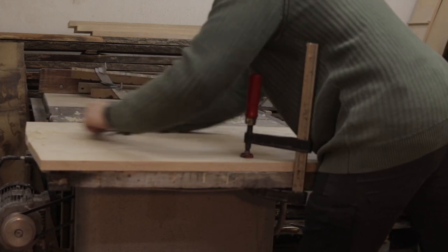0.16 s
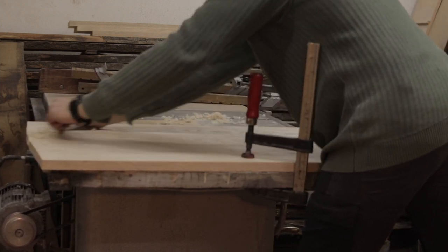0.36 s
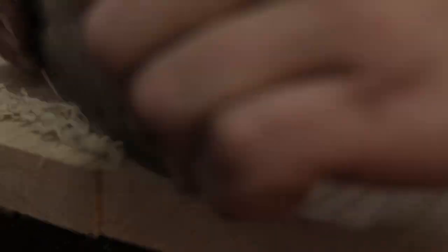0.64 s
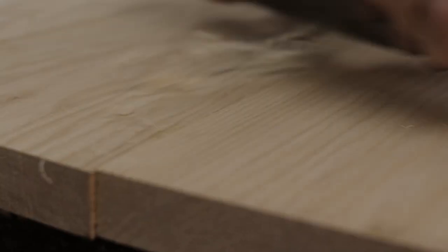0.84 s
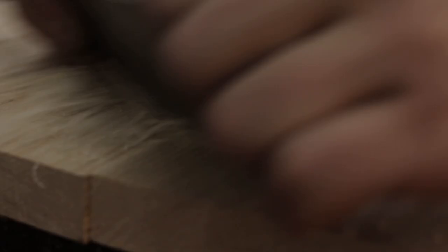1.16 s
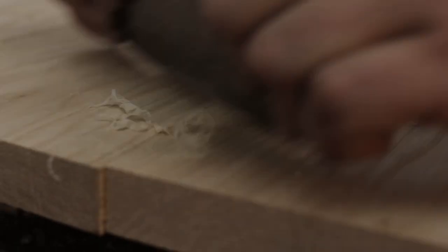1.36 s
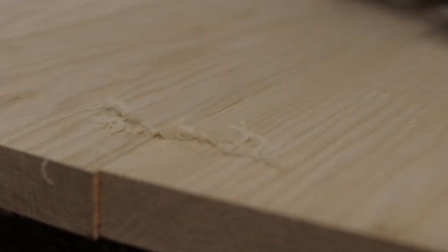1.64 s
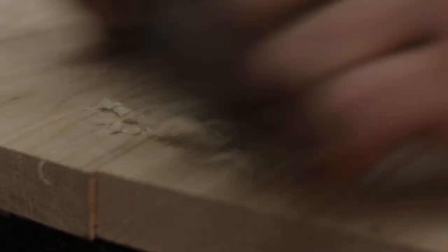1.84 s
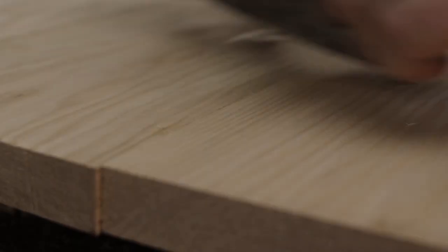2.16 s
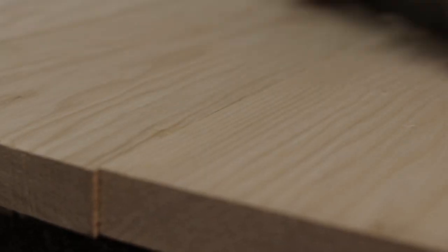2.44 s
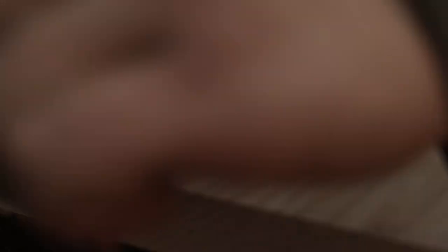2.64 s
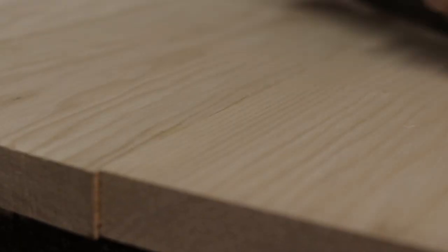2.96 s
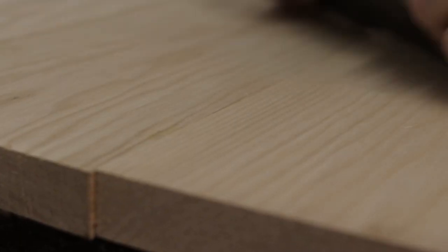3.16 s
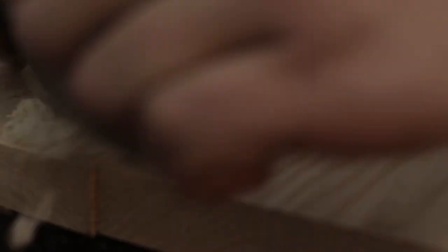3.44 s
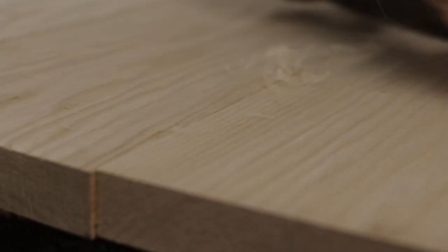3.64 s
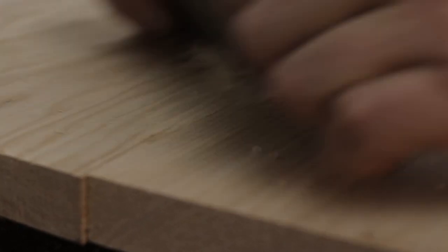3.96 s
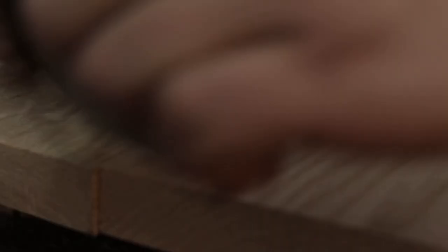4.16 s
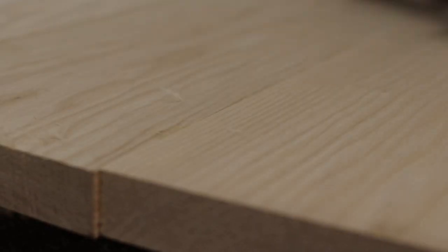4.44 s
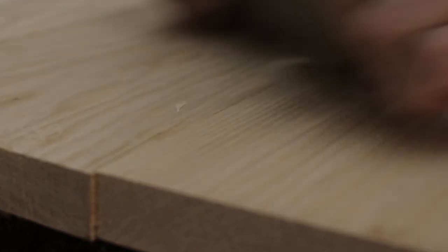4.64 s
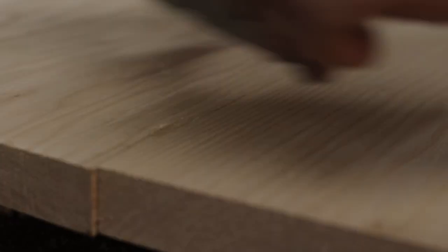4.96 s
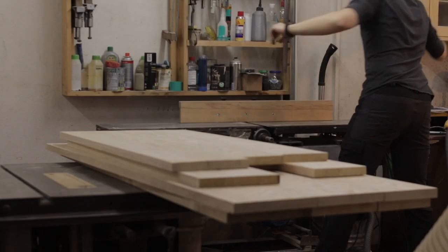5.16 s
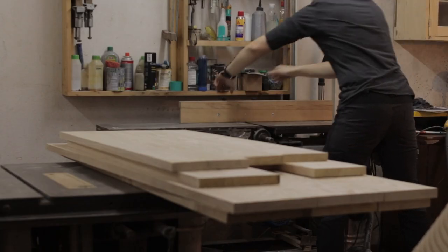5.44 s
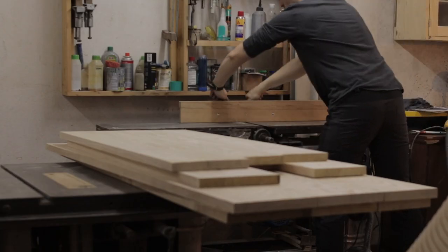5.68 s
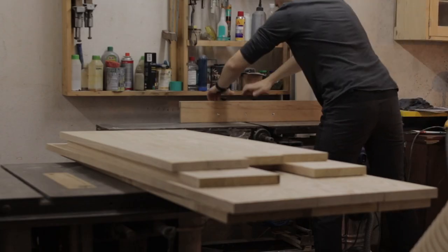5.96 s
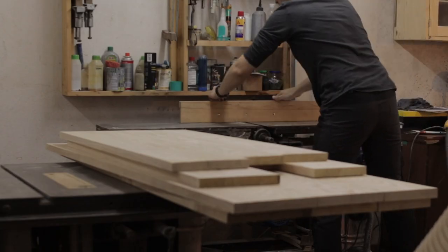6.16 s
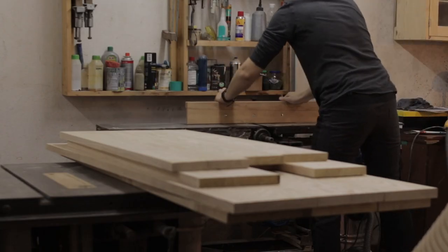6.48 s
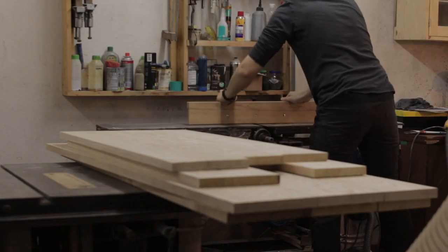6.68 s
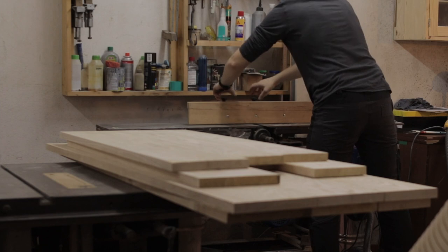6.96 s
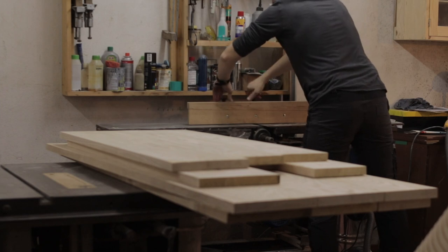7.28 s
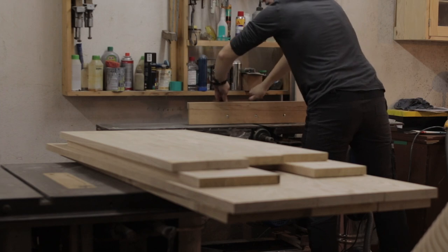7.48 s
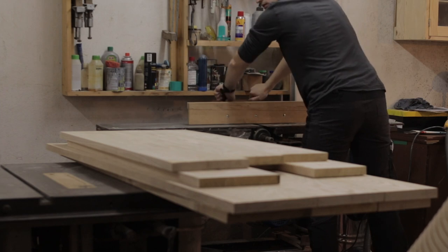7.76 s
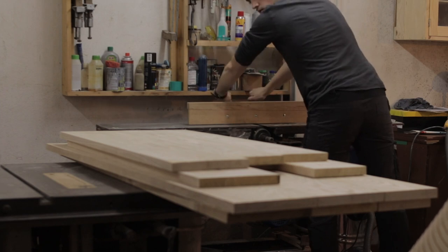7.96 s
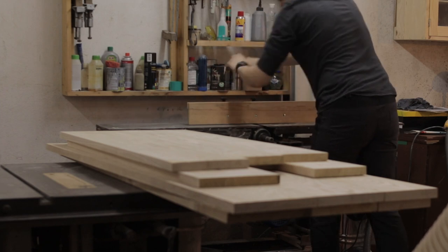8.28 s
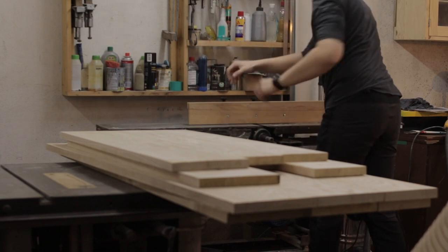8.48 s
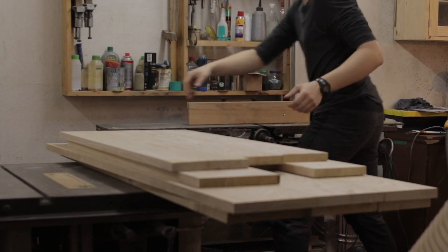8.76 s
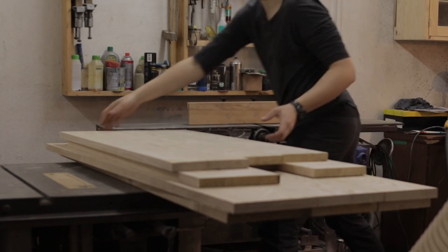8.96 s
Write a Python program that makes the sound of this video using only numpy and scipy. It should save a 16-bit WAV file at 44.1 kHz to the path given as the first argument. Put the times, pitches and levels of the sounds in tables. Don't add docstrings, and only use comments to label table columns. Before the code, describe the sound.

Quiet workshop: dry, hissy scrapes and woody ticks for five seconds, then a sudden switch to a droning woodworking machine with wavering metallic tones.

```python
import sys
import numpy as np
from scipy import signal
from scipy.fft import rfft, irfft, next_fast_len
from scipy.io import wavfile
from scipy.ndimage import uniform_filter1d, map_coordinates

SR = 44100
rng = np.random.default_rng(int(sys.argv[2]) if len(sys.argv) > 2 else 0)


def put_to_file(sound):
    columns = np.atleast_2d(sound).T
    safe = np.clip(columns, -1, 1)
    whole_steps = np.round(safe * 32767)
    wavfile.write(sys.argv[1], SR, whole_steps.astype(np.int16))


def gain_from_db(level_db):
    decades = np.asarray(level_db, float) / 20
    return 10 ** decades


N = 401751

VIEW_CHANGES = .5118, 5.0323
# pitch in Hz, width in Hz, level in dB.
BENCH_MODES = [(160, 56, 2), (192, 14, 1), (318, 270, 0.5)]
# pitch in Hz, likeness from 0 to 1.
ROOM_ALIKE = [(60, 0.93), (130, 1), (290, 0.99), (640, 0.84), (1410, 0.75), (3100, 0.44), (6820, 0.26),
              (15000, 0.07)]
# pitch in Hz, likeness from 0 to 1.
CARD_ALIKE = [(60, 0.82), (180, 0.74), (550, 0.99), (1650, 0.75), (4970, 0.3), (15000, 0.12)]
# pitch in Hz, left over right in dB.
JOINTER_LEAN = [(60, 3), (180, 0), (550, -1), (1650, -2), (4970, -1.0), (15000, -0.5)]
# pitch in Hz, left over right in dB.
CARD_LEAN = [(60, 2.5), (180, 1.5), (550, 2), (1650, -0.5), (4970, 0), (15000, 4)]


def unit(x):
    return x / np.sqrt(np.mean(np.abs(x) ** 2) + 1e-20)


def along(points, hz):
    f, v = np.transpose(points)
    return np.interp(np.log(hz + 1), np.log(f + 1), v)


def curves(rows):
    s, *cols = np.transpose(rows)
    return np.array([np.interp(np.arange(N) / SR, s, c) for c in cols])


def wobble(rate):
    return map_coordinates(rng.standard_normal(int(N * rate / SR) + 4), [np.arange(N) * rate / SR])


def filtered(x, response):
    m = next_fast_len(N + SR // 2)
    return irfft(rfft(x, m) * response(np.fft.rfftfreq(m, 1 / SR)), m)[..., :N]


def resonant(x, modes):
    f = np.fft.rfftfreq(8192, 1 / SR)
    power = sum(gain_from_db(2 * db) * (f * w) ** 2 / ((c * c - f * f) ** 2 + (f * w) ** 2) for c, w, db in modes)
    cepstrum = irfft(np.log(power / power.mean() + 1e-12) / 2)
    cepstrum[1:4096] *= 2
    cepstrum[4097:] = 0
    return signal.fftconvolve(x, irfft(np.exp(rfft(cepstrum)))[None], axes=1)[:, :N]


def gliding(x, centre_hz, width_hz):
    hz, t, z = signal.stft(x, SR, nperseg=256)
    centre = np.interp(t, np.arange(N) / SR, centre_hz)
    gain = np.sqrt(SR / np.pi / width_hz / (1 + (2 * (hz[:, None] - centre) / width_hz) ** 2))
    return signal.istft(z * gain, SR, nperseg=256)[1][:, :N]


def patchy(depth_db, count=(5, 6)):
    z = signal.stft(rng.standard_normal((2, N)), nperseg=512)[2]
    field = uniform_filter1d(rng.standard_normal(z.shape[1:]), size=count[0], axis=0)
    field = uniform_filter1d(field, size=count[1], axis=1)
    return unit(signal.istft(z * gain_from_db(depth_db * unit(field)), nperseg=512)[1][:, :N])


def wavering(turn, db):
    return np.sqrt(2) * gain_from_db(db) * np.array([np.sin(turn), np.cos(turn)])


def spread(pair, lean, alike):
    def turn(hz):
        return np.arccos(np.clip(along(alike, hz), 0, 1)) / 2
    mid, side = filtered(pair, lambda hz: np.array([np.cos(turn(hz)), np.sin(turn(hz))]))
    ears = np.array([mid + side, mid - side])
    return filtered(ears, lambda hz: gain_from_db(np.outer([.5, -.5], along(lean, hz))))


def shop(x):
    # pitch in Hz, time to fall 60 dB in seconds.
    fade_times = [(100, 0.46), (500, 0.58), (1200, 0.35), (2400, 0.33), (6000, 0.23), (14000, 0.055)]
    hz, t, z = signal.stft(rng.standard_normal((2, SR * 3 // 4)), SR, nperseg=256)
    tail = signal.istft(z * gain_from_db(-60 * t / along(fade_times, hz)[:, None]), SR, nperseg=256)[1]
    late = np.pad(x, ((0, 0), (300, 0)))
    return signal.fftconvolve(late, tail / np.linalg.norm(tail[0]), axes=1)[:, :N]


def rocking(column, fall):
    # time of the peak in seconds, floor board level in dB, bench frame level in dB.
    rocks = [(.12, -78.5, -64), (.3, -77, -62), (.5, -88.5, -72), (.72, -72.5, -62.5), (.86, -85, -86),
             (1.05, -80.5, -69.5), (1.38, -73.5, -60.5), (1.76, -88.5, -69.5), (2.04, -62, -50.5),
             (2.53, -81.5, -70), (2.76, -66, -55), (3.17, -86, -64), (3.51, -72.5, -65), (4.23, -69, -61.5),
             (4.8, -82, -75), (4.88, -77, -60.5)]
    t, rise = np.arange(N) / SR, 200
    return sum(gain_from_db(row[column] - np.maximum(rise * (row[0] - t), fall * (t - row[0]))) for row in rocks)


def hush():
    # pitch in Hz, level in dB per Hz.
    hiss_colour = [(200, -32.5), (350, -8.5), (500, -5.5), (700, -12.5), (1500, -15.5), (4000, -20.5),
                   (9000, -27), (13000, -34), (15800, -47)]
    # pitch in Hz, width in Hz, level in dB.
    joists = [(66.3, 18, -8.5), (101, 31, -3)]
    still = gain_from_db(-80) * unit(filtered(patchy(depth_db=1.5), lambda hz: gain_from_db(along(hiss_colour, hz))))
    floor, frame = (unit(resonant(resonant(rng.standard_normal((2, N)), m), m)) for m in (joists, BENCH_MODES))
    fan = wavering(2 * np.pi * 216 * np.arange(N) / SR + 1.1 * wobble(4.1), -84 + 1.3 * wobble(9))
    rocks = rocking(column=1, fall=32) * floor + rocking(column=-1, fall=79) * frame
    return spread(still + fan + rocks, CARD_LEAN, ROOM_ALIKE)


def squeaks():
    # start in seconds, pitch in Hz, length in seconds, level in dB.
    creaks = [
        (1.715, 1415, 0.091, -86),
        (2.41, 1410, 0.054, -84),
        (3.09, 1450, 0.057, -86),
        (4.31, 1452, 0.095, -81),
        (4.465, 1470, .055, -79),
        (4.52, 1470, 0.039, -84),
        (4.36, 2329, .11, -92),
        (6.395, 1250, 0.038, -34),
        (6.407, 1195, .03, -36),
        (6.425, 1250, .045, -38),
    ]
    t, out = np.arange(N) / SR, 0
    for s, hz, length, db in creaks:
        swell = np.sin(np.pi * np.clip((t - s) / length, 0, 1))
        out = out + wavering(2 * np.pi * hz * t + 0.56 * wobble(42.94), db) * swell
    return spread(out, JOINTER_LEAN, ROOM_ALIKE)


def singing(rest_db, swells):
    t = np.arange(N) / SR
    bells = sum(gain_from_db(db) * np.exp(-((t - s) / half) ** 2) for s, db, half in swells)
    return 20 * np.log10(gain_from_db(rest_db) + bells)


def knife_tones(turn, knife_hz):
    # multiple, level in dB, share mirrored, mirror phase in rad, swing in dB.
    strong = [(3, -35, 0.5, 0, 0.46), (4, -39.5, 0.061, 4.5, -1.5)]
    # multiple, level in dB.
    weak = [(7, -50.5), (8, -50), (9, -59), (10, -52.5), (11, -49.5), (12, -54), (13, -51), (15, -64),
            (16, -60), (17, -59), (18, -61), (19, -56), (20, -57.5), (21, -64), (22, -60), (23, -66),
            (24, -67), (25, -66), (28, -61)]
    # time in seconds, extra echo path in metres.
    operator = [(5.03, 0.19), (5.3, 0.19), (5.6, 0.23), (5.95, 0.19), (6.6, 0.17), (6.9, 0.14), (7.3, 0.04),
                (7.7, 0.013), (8.18, 0.05), (8.4, 0.23), (8.62, 0.28), (8.95, 0.4), (9.11, 0.62)]
    # time in seconds, level in dB, half length in seconds.
    second = [
        (5.6, -38.5, 0.62),
        (8.85, -41, 0.49),
    ]
    # time in seconds, level in dB, half length in seconds.
    fifth = [
        (5.12, -45, .25),
        (5.55, -46.5, 0.17),
        (6.2, -54, 0.44),
        (6.7, -51, 0.2),
        (8.4, -56, 0.18),
    ]
    # time in seconds, level in dB, half length in s.
    whine = [(5.148, -52, 0.21), (5.57, -49, 0.073), (6.41, -44.5, 0.31), (7.08, -42.5, 0.38),
             (7.958, -44.5, 0.18), (8.334, -43.5, 0.15), (8.596, -46, 0.046), (8.995, -45.5, 0.24)]
    path, = curves(operator)

    def mirror_db(k, share, phase):
        lag = phase - 2 * np.pi * k * knife_hz * path / 343
        return 20 * np.log10(np.abs(1 + np.clip(share, 0, .9) * np.exp(1j * lag)))

    orders = [(1, -31 + .5 * wobble(2.35)), (2, singing(-36, second) + 0.36 * wobble(7))]
    for k, db, share, phase, swing in strong:
        orders.append((k, db + mirror_db(k, share, phase) + swing * wobble(7)))
    orders += [(6, singing(-46, whine) + 0.22 * wobble(9)), (5, singing(-51.5, fifth) + wobble(12))]
    orders += [(k, db + 3 * wobble(4.7)) for k, db in weak]
    return sum(wavering(k * turn + 1.53 * rng.standard_normal(), db) for k, db in orders)


def sheet_guards():
    # pitch in Hz, resting level in dB, phase wander in rad.
    sheet_modes = [(329.8, -44.5, 1.1), (383, -48, .8), (597.5, -45.5, .3), (3102, -52, .9), (635, -62, .4),
                   (850, -65, .5), (3417, -65, .6)]
    # time in seconds, level in dB, half length in seconds.
    flares = [
        [(5.12, -48, 0.22), (5.4, -56, 0.097), (5.83, -50, 0.16), (6.3, -54, 0.78), (8.25, -53, .2),
         (8.75, -52, 0.26)],
        [(5.27, -47, .15), (5.7, -45, 0.17), (6.2, -43, 0.24), (7.08, -47, 0.1), (7.46, -44, 0.16),
         (8.25, -41.5, 0.43), (8.95, -41.5, 0.32)],
        [(5.27, -37, 0.1), (5.52, -38.5, 0.063), (6.0, -36, 0.14), (6.5, -44, 0.11), (6.8, -40, 0.16),
         (7.33, -36, 0.2), (7.9, -38.5, 0.14), (8.33, -39, 0.12), (8.7, -45, 0.08), (9.11, -40, 0.088)],
        [(5.12, -55, 0.14), (5.88, -53, 0.12), (6.35, -51, 0.054), (6.7, -47, 0.059), (7.1, -49, 0.16),
         (7.75, -58, 0.2), (8.15, -45, 0.22), (8.6, -43.5, 0.12), (9.05, -41, 0.063)],
        [(5.2, -45, 0.2), (7.7, -52, .15), (8.3, -52, .1), (8.85, -49, .2)],
        [(5.1, -49, .1), (5.6, -50, 0.18), (8.25, -54, 0.14)],
        [(7.35, -46, .15), (7.7, -52, .1), (8.3, -51, .12), (8.8, -49, .2)],
    ]
    t, out = np.arange(N) / SR, 0
    for (hz, db, wander), swells in zip(sheet_modes, flares):
        turn = 2 * np.pi * hz * t + wander * wobble(9)
        out = out + wavering(turn, singing(db, swells) + 1.9 * wobble(14))
    return out


def jointer_body():
    # pitch in Hz, width in Hz, rms level in dB.
    body_modes = [(64, 12, -56), (84, 8, -59), (100, 14, -62), (132, 14, -63), (165, 14, -56), (198, 8, -53),
                  (216, 6, -58), (305, 25, -55), (396, 10, -51), (461, 13, -56), (528, 6, -56),
                  (550.7, 6, -51), (635, 6, -53), (682, 6, -58), (850, 9, -55), (923, 36, -52),
                  (1064, 10, -56), (1123, 21, -53), (1399, 10, -58), (1457, 15, -58), (1582, 25, -55),
                  (1725, 20, -56), (1835, 16, -53), (1969, 8, -54), (2040, 10, -58), (2100, 26, -58),
                  (2240, 25, -55), (4011, 20, -57), (4280, 15, -61),
                  (2324, 8, -55), (2356, 6, -57), (2390, 20, -54), (2563, 5, -59), (2651, 12, -54),
            (2677, 10, -55), (2707, 8, -56), (2744, 10, -53), (2848, 13, -59), (2934, 5, -61),
            (2982, 5, -58), (3066, 10, -54), (3140, 60, -52), (3417, 14, -52), (3486, 14, -52),
            (3550, 9, -60), (3737, 11, -62), (3885, 9, -57), (3905, 49, -53), (3937, 5, -62),
            (4098, 8, -65), (4191, 14, -58), (4325, 7, -65), (4489, 5, -62), (4553, 6, -63),
            (4615, 10, -65), (4681, 19, -57), (4835, 13, -63), (5000, 36, -56), (5713, 16, -68),
            (5842, 18, -71), (5926, 29, -69), (6374, 9, -72), (6708, 21, -71), (6827, 20, -68),
            (6996, 11, -68), (7082, 11, -70), (7285, 54, -67), (7368, 14, -71), (7481, 17, -67)]

    def ring(f):
        return np.sqrt(sum(gain_from_db(2 * db) * SR / (np.pi * w) / (1 + (2 * (f - c) / w) ** 2) ** 2 * 2
                           for c, w, db in body_modes))
    return gain_from_db(2.5) * filtered(rng.standard_normal((2, N)), ring)


def air_rush(turn):
    # pitch in Hz, level in dB per Hz.
    rush_colour = [(20, -24), (50, -15), (110, -18.5), (165, -3.5), (450, -3), (1000, -4.5), (1370, -6.5),
                   (2300, -5), (3600, -11), (5000, -12.5), (5250, -18.5), (8000, -22), (10500, -31),
                   (15500, -46)]
    pulsed = (1 + .05 * np.sin(turn)) * gain_from_db(.3 * wobble(4) + .9 * wobble(30)) * patchy(depth_db=1.5)
    knots = rng.standard_normal(SR // 2)

    def ripple_db(hz):
        return 1.2 * map_coordinates(knots, [hz / 14])
    return gain_from_db(-32.5) * unit(filtered(pulsed, lambda hz: gain_from_db(along(rush_colour, hz) + ripple_db(hz))))


def jointer():
    knife_hz = 251.5
    turn = 2 * np.pi * np.cumsum(knife_hz + .08 * wobble(3)) / SR
    parts = knife_tones(turn, knife_hz) + sheet_guards() + jointer_body() + air_rush(turn)
    return spread(parts, JOINTER_LEAN, ROOM_ALIKE)


def streaks():
    # start in seconds, length in seconds, pitch at start in Hz, pitch at end in Hz, level in dB.
    glints = [(.04, 0.072, 6800, 6200, -45), (0.161, 0.16, 3300, 3000, -50), (.17, 0.09, 7200, 6900, -52),
              (.33, 0.063, 3200, 3100, -55), (0.453, .055, 1450, 786, -48), (.455, .05, 2800, 2890, -55),
              (0.513, 0.033, 3600, 3300, -42), (0.534, .05, 6300, 6000, -44), (6.043, .07, 2700, 2670, -37),
              (1.148, .11, 11700, 11940, -46), (1.169, .05, 3400, 3600, -46), (1.19, .07, 7000, 7300, -49),
              (1.222, .11, 900, 600, -55), (1.87, .08, 4900, 4700, -45.5), (1.938, .055, 3800, 4400, -38.5),
              (1.895, .1, 6700, 6400, -47), (1.925, 0.037, 2200, 2100, -44.5),
              (2.008, .03, 1400, 1400, -39), (2.04, .045, 4100, 4070, -52.5), (2.55, .02, 1500, 1470, -48),
              (2.572, .07, 3400, 3300, -45), (2.585, .05, 4700, 4700, -45), (2.59, 0.044, 6900, 6740, -45),
              (2.64, 0.059, 3900, 4300, -40.5), (2.71, .028, 1000, 805, -47), (3.29, .14, 3500, 3300, -56),
              (3.33, .08, 11500, 11500, -54), (6.993, .045, 2590, 2000, -37), (5.528, .06, 2000, 1990, -39),
              (3.94, .1, 11800, 12000, -54), (3.95, .08, 3300, 3800, -52), (4.01, 0.055, 7300, 7500, -49),
              (4.123, 0.081, 3700, 3500, -53), (4.16, 0.05001, 1300, 1010, -57),
              (4.68, 0.12, 11300, 11600, -51), (4.72, .06, 3500, 3600, -45), (4.74, .1, 14300, 14500, -53),
              (4.79, .1, 1300, 995, -57), (4.852, 0.039, 3600, 3500, -57), (5.87, 0.06, 1970, 1900, -41)]
    out = np.zeros((2, N))
    for (s, length, from_hz, to_hz, db), luck in zip(glints, rng.standard_normal((len(glints), 4, 400))):
        t = np.arange(round(length * SR)) / SR
        knot = t * (450 + .05 * from_hz)
        a, b, c, d = (map_coordinates(row, [knot]) for row in luck)
        turn = 2 * np.pi * np.cumsum(from_hz + (to_hz - from_hz) * t / length) / SR
        band = np.array([a * np.sin(turn) + b * np.cos(turn), c * np.sin(turn) + d * np.cos(turn)])
        swell = np.sqrt(np.sin(np.pi * t / length).clip(0))
        out[:, round(s * SR):][:, :len(t)] += gain_from_db(db) * swell * band
    return spread(out, CARD_LEAN, CARD_ALIKE)


def taps():
    # time in seconds, level in dB, steel in dB relative to it, thud in dB relative to it.
    contacts = [(0.464, -48, -10, -18), (.471, -42, -10, -19), (.484, -50, -15, -9), (0.494, -47, -20, -14),
                (1.08, -49.5, -20, -3), (1.123, -56, -1, -8), (1.134, -55, 0, -15),
                (1.7967, -40.5, 4, -11.5), (1.798, -46, 3, -6), (1.803, -53.5, -14.5, -3.5),
                (1.851, -45.5, -5.5, -9.5), (2.485, -58, -9, 2), (2.558, -51, -9, -23),
                (2.716, -40.5, -18.5, -3), (2.7252, -32, 0, -8), (3.1383, -42, -21, -5),
                (3.145, -52, -26, -2), (3.154, -61, -30, 12), (3.169, -67, -30, 15), (3.241, -47, 0, -17),
                (3.888, -70, -7, -11), (3.952, -52, -3, -15), (4.185, -41.5, -7, -0.5),
                (4.209, -46, -9, -2), (4.602, -55, -5, -1.5), (4.6815, -40, -2, -23), (4.6888, -37, 3, -30)]
    # pitch in Hz, level in dB, time to fall 60 dB in seconds.
    rap = [(1080, 1, 0.013), (1510, -4, .009)]
    # pitch in Hz, level in dB, time to fall 60 dB in seconds.
    tick = [(2200, 5.5, 0.0069), (3365, 4.5, 0.007), (4700, -1, .004)]
    # pitch in Hz, level in dB, time to fall 60 dB in seconds.
    thud = [(367.5, -5.5, 0.059), (530, 0, 0.028), (760, -3.5, .03)]
    out, t = np.zeros(N), np.arange(SR // 8) / SR
    for (s, db, steel_db, thud_db), luck in zip(contacts, rng.standard_normal((len(contacts), 2, 8))):
        modes = rap + [(hz, m + steel_db, t60) for hz, m, t60 in tick]
        modes = modes + [(hz, m + thud_db, t60) for hz, m, t60 in thud]
        ringing = 0
        for (hz, m, t60), a, b in zip(modes, *luck):
            fade = gain_from_db(db + m + 1.5 * a - 60 * t / t60)
            ringing = ringing + fade * np.sin(2 * np.pi * hz * (1 + 0.087 * b) * t)
        give_s = 0.00018 * gain_from_db(-.45 * steel_db)
        crack = gain_from_db(db + steel_db + 3) * np.exp(-t / .00008)
        here = out[round(s * SR):][:len(t)]
        here += ringing * (1 - np.exp(-t / give_s)) ** 2
        here += crack
    band = signal.butter(2, (320, 5500), 'band', fs=SR, output='sos')
    return signal.sosfilt(band, out) * np.array([[1], [.4]])


def pushes():
    # touch in seconds, bite in seconds, lift in seconds, level at bite in dB, level at lift in dB.
    strokes = [(-.2, 0.192, 0.31, -43, -43.5), (-.05, 0.078, 0.091, -43, -49),
               (0.305, 0.364, 0.39, -52.5, -55), (0.514, 0.512, 0.59, -38.5, -42.5),
               (0.593, 0.67, 0.7, -54.5, -55.5), (1.104, 1.194, 1.261, -39.5, -41),
               (1.803, 1.807, 2.04, -57.5, -52), (1.846, 1.91, 1.92, -40, -35.5),
               (1.988, 2.009, 2.026, -43, -45), (2.495, 2.603, 2.668, -39.5, -39),
               (2.718, 2.729, 2.708, -42.5, -53.5), (3.177, 3.3, 3.41, -47.5, -48.5),
               (3.39, 3.442, 3.477, -53.5, -54.5), (3.892, 4.005, 4.15, -45, -45),
               (3.949, 3.954, 3.9, -53.5, -49), (4.606, 4.635, 4.7, -54, -50.5),
               (4.64, 4.742, 4.785, -43, -44), (4.755, 4.83, 4.86, -52.5, -55.5)]
    # flex pitch in Hz, flex in dB, dust fizz in dB, board in dB.
    grips = [(3300, -11, -14, -11.5), (4800, -24, -15.5, -6), (3260, 8, -19, -4.5),
             (3400, -13, -1.5, -12.5), (3600, -5.5, -6, -1.5), (3740, -9.5, -3, -13.5),
             (4800, -1.5, -4, -6.5), (4470, -4, 0, -14.5), (3770, 5.5, -12, -1), (3750, -6.5, -0.5, -10.5),
             (3460, 3.5, -14.5, 0.5), (3720, -2, -1, -9.5), (3750, -10.5, -1, -4.5), (3900, -4, -3.5, -10),
             (3300, 5, -5.5, -18), (3500, -1.5, -9, -14), (3870, -5, 4, -15), (3850, -4, 1.5, -3.5)]
    glides = [-0.28, .05, -0.027, 0.023, 0.033, -0.0077, 0, -.33, -0.0023, 0.37, 0, 0.09, 0, -0.028, 0,
              -0.029, 0.16, 0]
    travel_db = (-3.5, 1, 0)
    touch_db, land_s, release_db_per_s = -63, .02, 299.5
    light_db, rest_hz = 23.5, 3450
    t, parts = np.arange(N) / SR, 1e-9
    for (touch, bite, lift, bite_db, lift_db), grip, glide in zip(strokes, grips, glides):
        flex_hz, flex_db, fizz_db, board_db = grip
        db = np.interp(t, [touch - land_s, touch, bite, lift, lift + 1],
                       [-100, touch_db, bite_db, lift_db, lift_db - release_db_per_s], left=-200)
        light = np.clip((min(bite_db, lift_db) - db) / light_db, 0, 1)
        across = np.interp(t, [touch, lift, lift + .1], travel_db) * (touch > VIEW_CHANGES[0])
        flex_hz = flex_hz * 2 ** np.interp(t, [bite, lift], [-glide / 2, glide / 2])
        flex_hz = flex_hz + (rest_hz - flex_hz) * light
        leaving = light * (t > lift)
        fizz = gain_from_db(fizz_db - 9 * light - 11 * leaving)
        board = gain_from_db(board_db + 8 * light + 6.5 * leaving)
        parts = parts + gain_from_db(db) * np.array([1 + 0 * t, fizz, board, flex_hz, gain_from_db(flex_db + 0 * t), across])
    return *parts[:3], *parts[3:] / parts[0]


def fibres(spread_db):
    grain = gain_from_db(spread_db * wobble(1500) + 1.2 * wobble(250) + .3 * wobble(50))
    return unit(grain * patchy(depth_db=1.8, count=(2, 6)))


def scraper():
    # pitch in Hz, width in Hz, level in dB.
    card_modes = [(2520, 1400, 5), (3380, 250, 7), (4740, 920, 7), (6770, 990, 3), (7600, 1400, -1)]
    # pitch in Hz, width in Hz, level in dB.
    burr_modes = [(7200, 3700, 4.5), (10500, 1300, 2.5), (11700, 2200, 1), (14300, 2500, -5.5)]
    # pitch in Hz, width in Hz, level in dB.
    board_modes = [(620, 210, -4), (900, 520, -5.5), (1316, 520, 0), (2090, 890, -1.5)]
    # pitch in Hz, width in Hz, level in dB.
    knock_modes = [(446, 740, -2.5), (719, 250, 2.5), (1110, 310, -1.5), (1560, 900, 3.5),
                   (2300, 800, -14.5)]
    # start in seconds, level in dB, length in seconds,
    # steel in dB relative to it, bench in dB relative to it.
    judder = [(0.455, -48.5, 0.045, -29.5, -24), (1.032, -82, 0.035, 10, -11), (1.895, -55, 0.011, 4, -18),
              (1.941, -52.5, .006, 2, -16), (1.969, -46, 0.008, 13.5, -9.5),
              (2.013, -38.5, 0.018, 0.5, -23), (2.558, -52.5, 0.014, -3, -18), (2.605, -52, .016, 9, -17),
              (2.68, -47.5, 0.009, 10, -22), (2.7255, -37.5, 0.012, -3.5, -13),
              (3.442, -54.5, 0.02, -16, -5.5), (4.168, -46.5, 0.04, -17.5, -13),
              (4.686, -55.5, 0.008, 4, -40)]
    cut, fizz, board, flex_hz, bend, across = pushes()
    tear = fibres(spread_db=0.5)
    steel, wood, burr = cut * tear, board * tear, fizz * tear
    struck, bench, t = np.zeros((2, N)), np.zeros((2, N)), np.arange(SR // 10) / SR
    for s, db, length, steel_db, bench_db in judder:
        slips = gain_from_db(2 * np.repeat(rng.standard_normal(len(t) // 105), repeats=105))
        swell = np.clip(t / 0.0018, 0, 1) / (1 + (t / length) ** 6)
        skip = gain_from_db(db) * slips * swell * rng.standard_normal((2, len(t)))
        for part, rel_db in (struck, 0), (steel, steel_db), (burr, steel_db - 16.5), (bench, bench_db):
            part[:, round(s * SR):][:, :len(t)] += gain_from_db(rel_db) * skip
    flex = bend * gain_from_db(-7) * gliding(steel, flex_hz, width_hz=400)
    metal = gain_from_db(-2.5) * resonant(steel, card_modes) + flex + resonant(burr, burr_modes)
    knock = resonant(resonant(struck, knock_modes), knock_modes) / 3
    timber = knock + resonant(resonant(bench, BENCH_MODES), BENCH_MODES) / 8
    no_bass = signal.butter(2, 260, 'high', fs=SR, output='sos')
    cutting = signal.sosfilt(no_bass, metal + resonant(wood, board_modes))
    placed = spread(cutting + timber + taps(), CARD_LEAN, CARD_ALIKE)
    return placed * gain_from_db(np.outer([.5, -.5], across))


def scene():
    t = np.arange(N) / SR
    first, last = (np.clip((t - s) / 0.0012, 0, 1) for s in VIEW_CHANGES)
    card = scraper()
    wide, close = card * (1 - first), card * first
    wide_view = (wide + gain_from_db(-4.0) * shop(wide)) * (1 - first)
    close_view = close + gain_from_db(-8.0) * shop(close)
    bench = wide_view + close_view + hush()
    return bench * (1 - last) + jointer() * last + squeaks() + streaks()


def low_pass(x):
    return signal.sosfilt(signal.butter(12, 16480, fs=SR, output="sos"), x)


def record(dry):
    mix = filtered(dry, lambda hz: hz < 15720)
    return low_pass(mix)


dry = scene()
out = record(dry)
put_to_file(out)
```